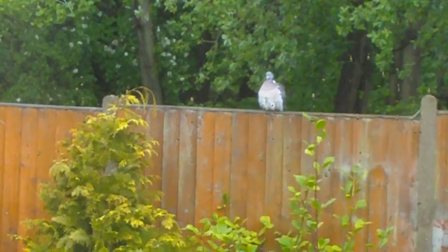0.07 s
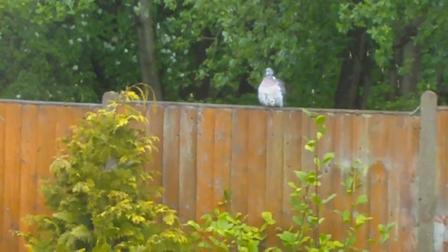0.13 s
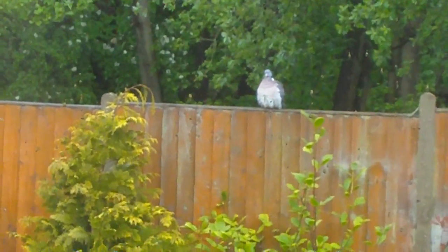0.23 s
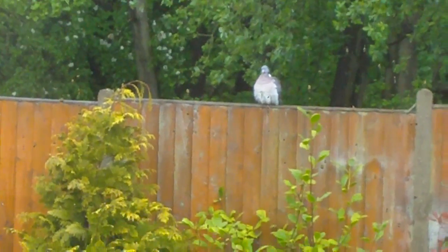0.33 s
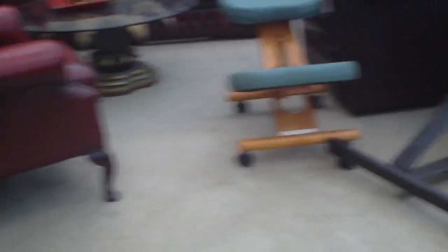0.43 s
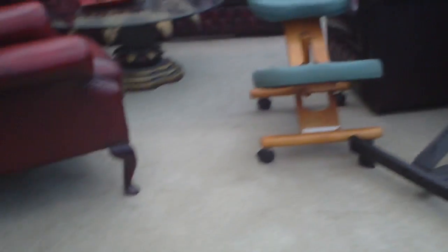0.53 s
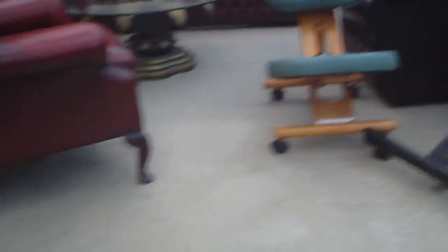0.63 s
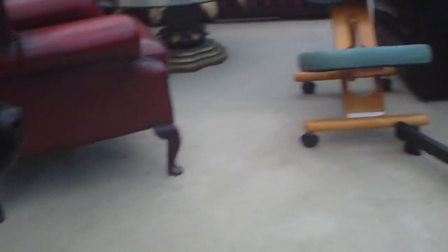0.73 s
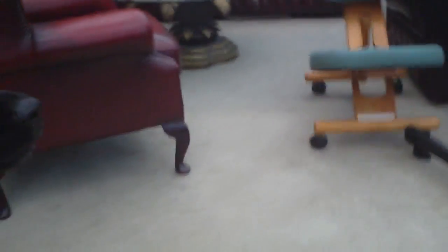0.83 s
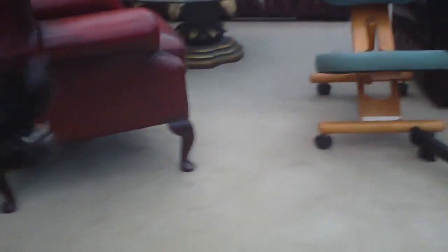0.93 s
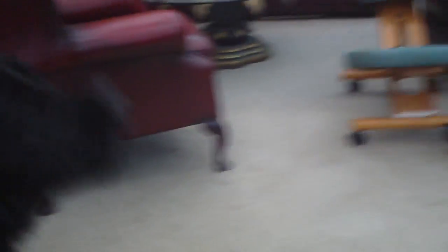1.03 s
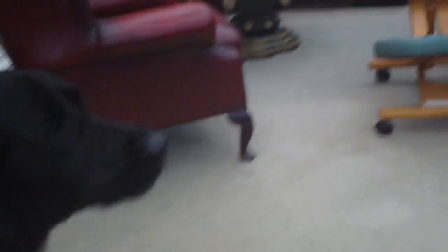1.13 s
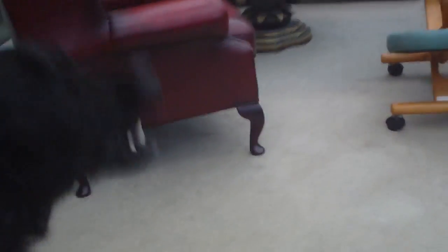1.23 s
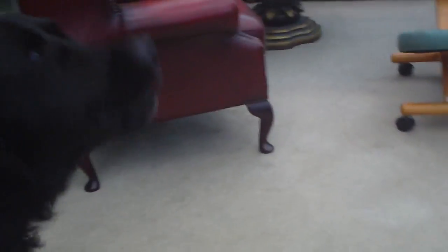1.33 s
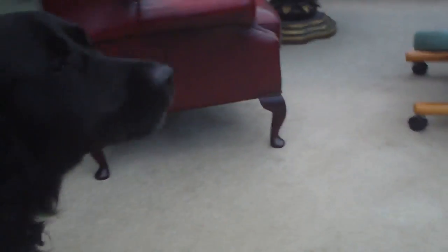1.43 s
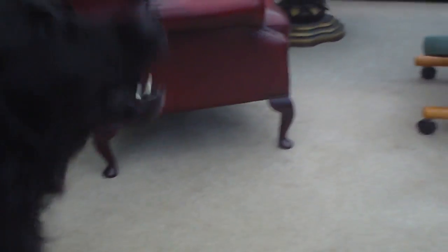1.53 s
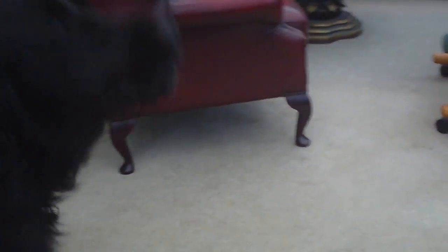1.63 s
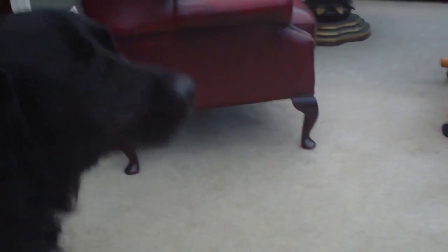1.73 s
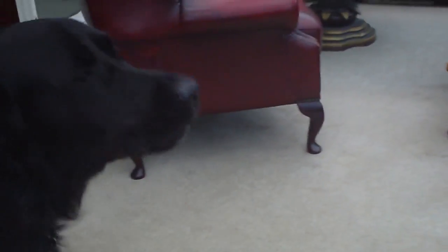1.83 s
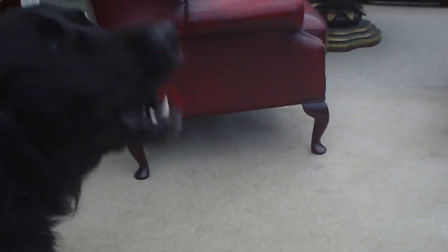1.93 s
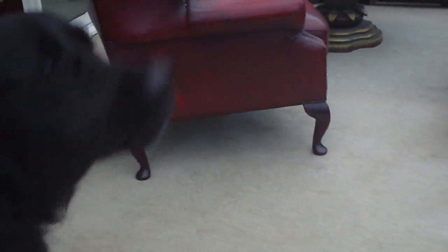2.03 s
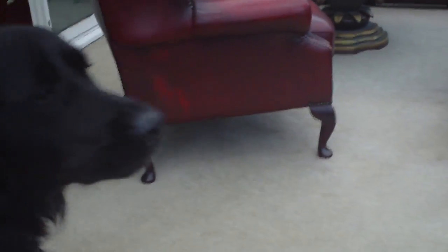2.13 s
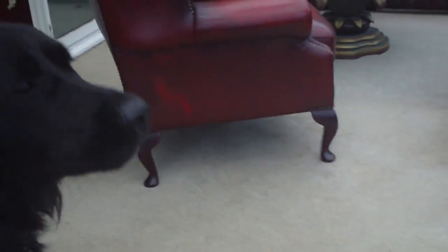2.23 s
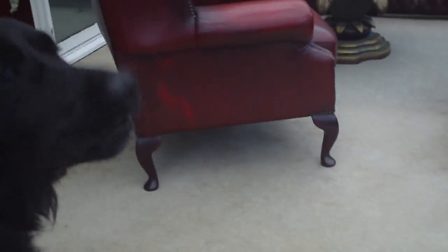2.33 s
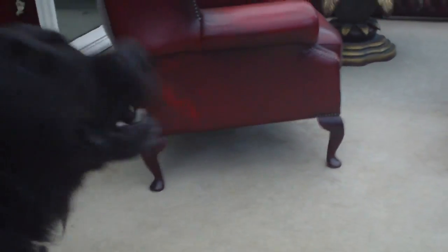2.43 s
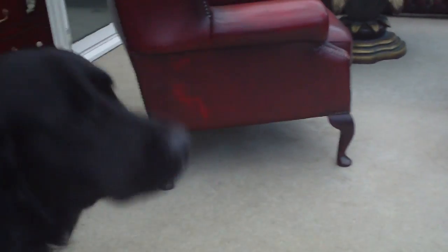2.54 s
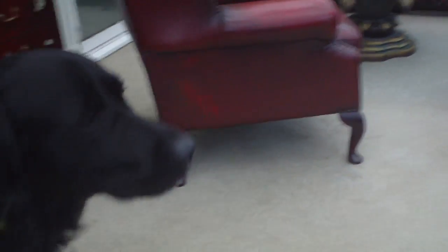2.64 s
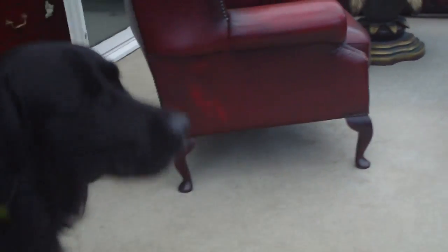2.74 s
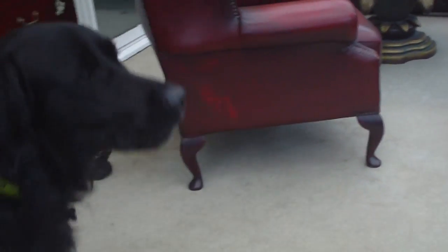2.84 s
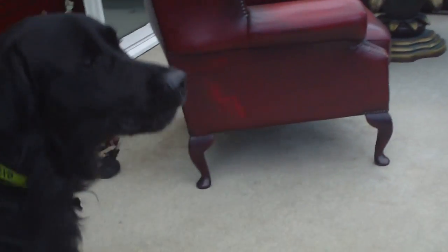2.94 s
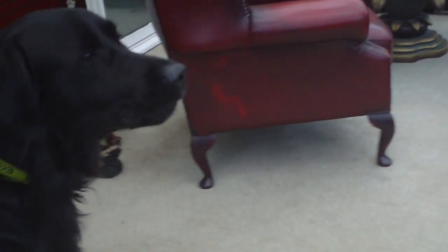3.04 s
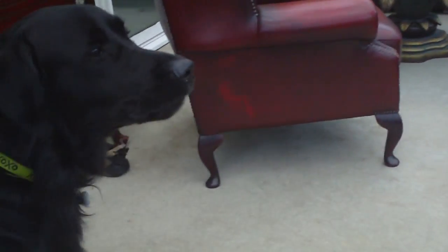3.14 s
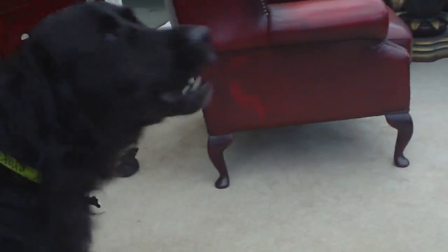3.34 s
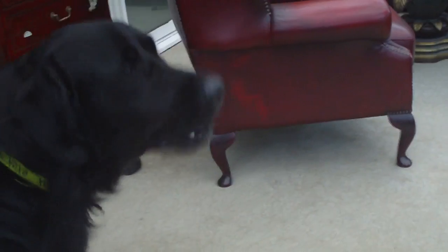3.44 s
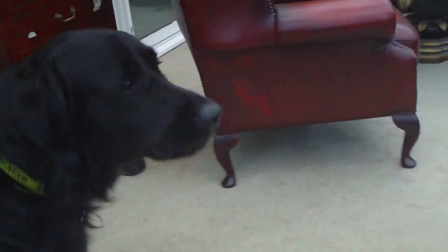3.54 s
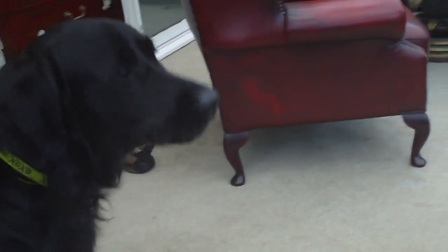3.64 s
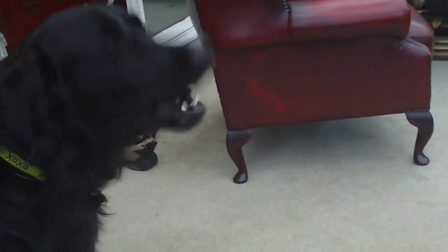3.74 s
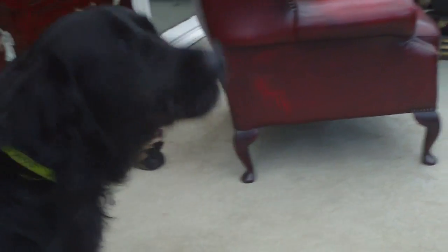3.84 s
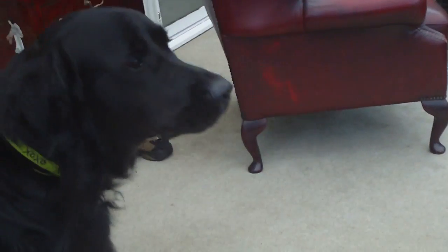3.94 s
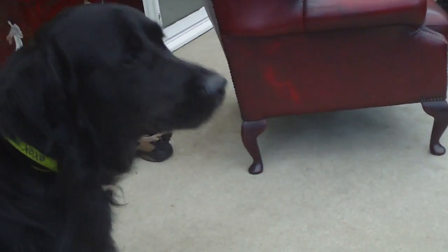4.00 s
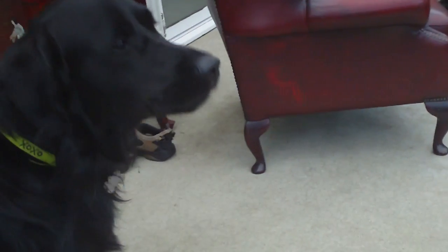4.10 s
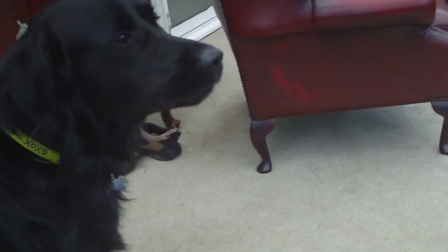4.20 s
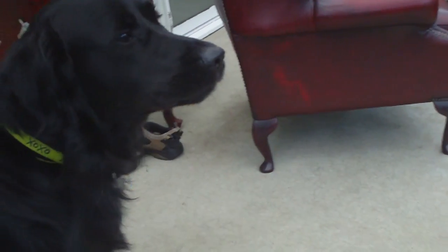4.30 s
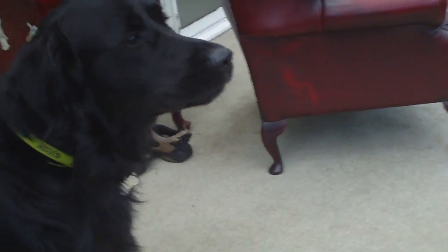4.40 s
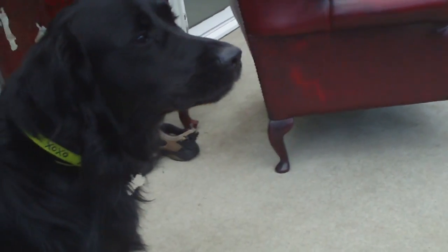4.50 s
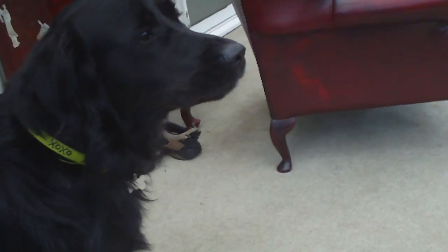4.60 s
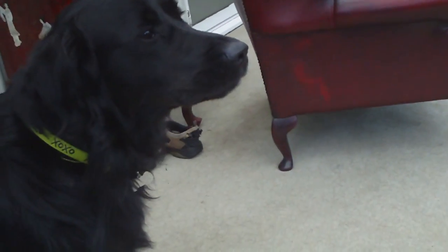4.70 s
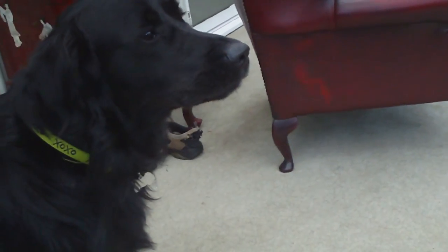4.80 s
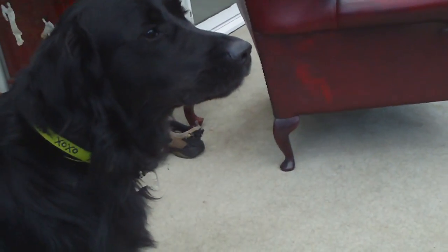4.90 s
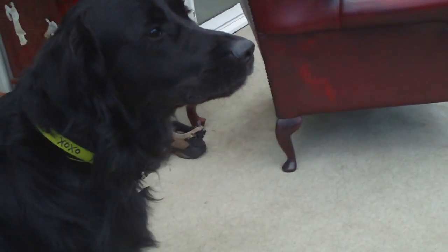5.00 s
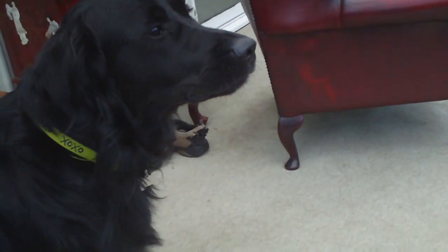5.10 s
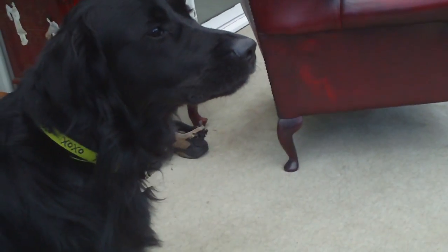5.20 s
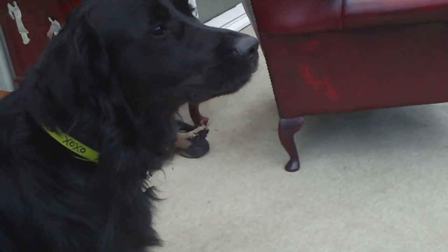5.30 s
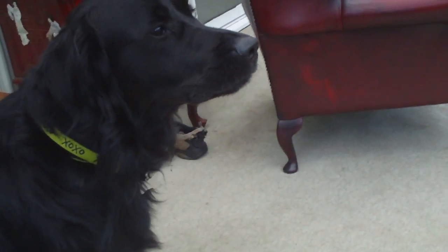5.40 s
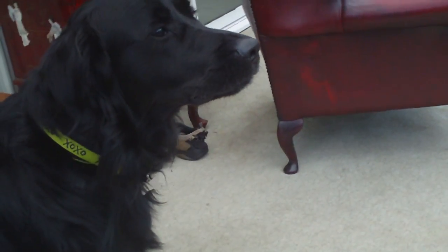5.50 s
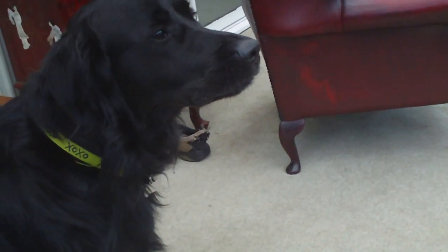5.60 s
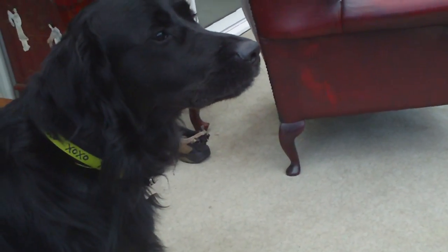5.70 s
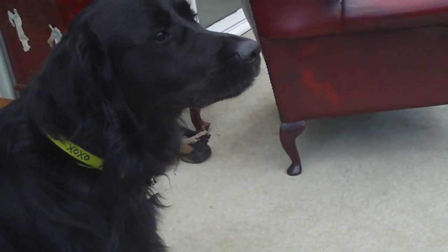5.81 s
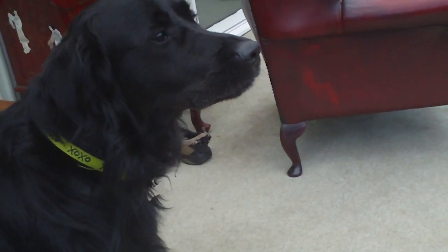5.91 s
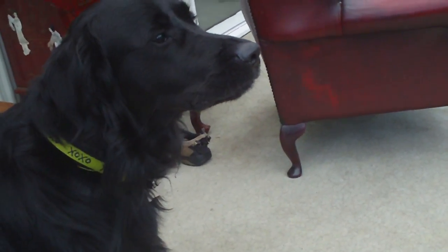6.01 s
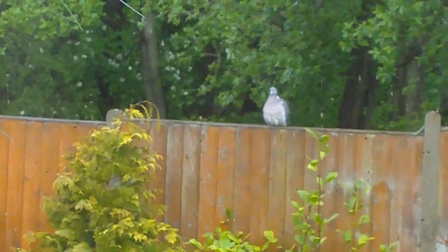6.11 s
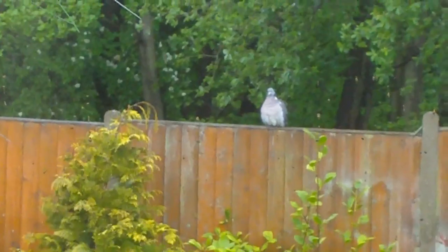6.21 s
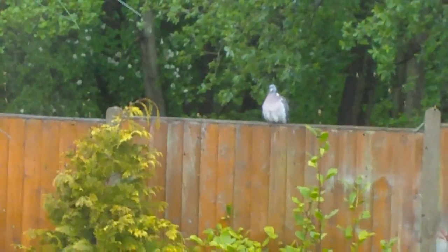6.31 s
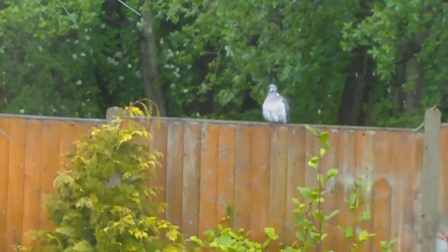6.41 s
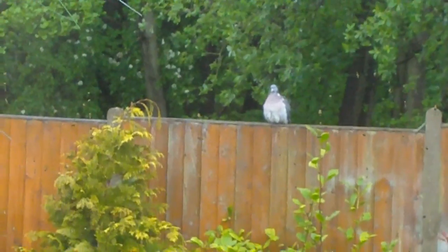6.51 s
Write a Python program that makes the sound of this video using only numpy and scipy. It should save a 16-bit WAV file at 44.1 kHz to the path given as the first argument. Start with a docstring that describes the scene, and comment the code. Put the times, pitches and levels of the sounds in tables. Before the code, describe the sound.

Sharp, close barks from a big dog in a living room, with low growling between and after them and a faint collar tag tinkle.

```python
"""Soft hiss and two dry clicks, then a large dog growls and barks seven times in a carpeted living room.
Slack vocal folds flap behind a shut mouth for the growl; each bark bursts out of it as the folds are
driven hard and the jaws open, then sinks back. A metal tag tinkles on the collar, the jowls flap once,
and a long growl and a last short one end the scene. The gain control of a small camera close by clamps
down at the first bark, and its hiss creeps back once the barking stops."""
import sys
import numpy as np
from scipy import signal
from scipy.fft import rfft, irfft
from scipy.io import wavfile
from scipy.ndimage import uniform_filter1d, minimum_filter1d

SR = 44100
rng = np.random.default_rng(int(sys.argv[2]) if len(sys.argv) > 2 else 0)


def persist_wave(psi):
    """Save psi, clipped to +-1, as 16-bit WAV."""
    counts = np.round(np.clip(psi, -1, 1) * 32767).astype(np.int16)
    wavfile.write(sys.argv[1], SR, np.atleast_2d(counts).T)


N = 288855

# The colour of the hiss. Each row: frequency in Hz, relative level in dB.
HISS_COLOUR = [(30, 0.5), (60, -3.5), (100, -3.5), (220, 0.5), (600, -1.5), (1300, -4), (2200, -6),
               (3200, 2), (4000, -5.5), (4700, -14), (8300, -13.5), (10500, -21), (13000, -25),
               (15000, -18)]
# The slow drift of the hiss. Each row: time in seconds, level in dB.
HISS_DRIFT = [(0, -57), (.35, -53), (1, -50), (3, -45.5), (5.5, -52.5), (6, -56), (6.55, -52.5)]
# The camera's faint whine. Each row: frequency in Hz, level in dB.
WHINE_TONES = [(1085, -67.5), (6540, -72.5)]
# Small dry clicks near the camera. Each row: start in seconds, level in dB.
CLICKS = [(0.1546, -36), (0.204, -44.5)]

# The short growls, before they tense around the barks. Each row: start and length in seconds, first and
# last pitch in Hz, first and last effort in dB, lip opening in dB, muzzle ring in Hz, its level in dB.
SHORT_GROWLS = [ (0.681, .33, 65.4, 109.2, -43.5, -25.5, -5.5, 498, -8),
                (1.164, .18, 122, 112.4, -32.5, -36.5, 1.5, 625.3, -22),
                (1.46, 0.24, 115, 110.7, -36, -37, -3.5, 620, -26),
                (1.76, .25, 103.4, 98, -27.5, -21.5, 4, 621.3, -7.5),
                (2.12, 0.35, 102, 97.5, -31.5, -28, -3.5, 603, -23.5),
                (2.607, 0.165, 93.8, 85.2, -31.5, -47, -7, 620, -20),
                (3.269, 0.16, 80.2, 103.7, -34, -27, 7.5, 632, -17),
                (3.55, .3, 103.3, 100.3, -40.5, -29.5, 3, 653, -13),
                (6.119, 0.52, 56.53, 53.7, -38, -37.5, 3.5, 511, -10)]
# The sinking pitch of the long growl. Each row: time in seconds, pitch in Hz.
LONG_GROWL_PITCH = [(4.0, 115), (4.032, 110.8), (4.286, 97.6), (4.48, 95.3), (4.564, 86.2), (4.674, 71.77),
                    (4.862, 70.9), (4.98, 64.8)]
# Its voice: first and last effort in dB, lip opening in dB, muzzle ring in Hz, its level in dB.
LONG_GROWL_VOICE = (-28, -38.5, -4, 643.5, -11)
# The throat's resonances with the mouth shut. Each row: centre in Hz, width in Hz, relative level in dB.
SHUT_THROAT = [(124, 67, 0.0051), (188, 80, 0.35)]
# Upper resonances let out by the lips. Each row: centre in Hz, width in Hz, relative level in dB.
LIP_RESONANCES = [(338, 48, -7), (386, 270, -14.5)]

# The collar tag's modes. Each row: frequency in Hz, relative level in dB, seconds to fade by 60 dB.
TAG_MODES = [(6923, -22, .3), (7784, 0, .55), (14090, -13, .32)]
# Knocks on the tag. Each row: start in seconds, level in dB.
TAG_KNOCKS = [(.8, -62), (1.557, -40), (1.841, -28.5), (6.12, -64.5), (6.22, -60.5), (6.3, -63),
              (6.42, -64)]

# The barks; strain is the level of the overtones against the fundamental. Each row: start, length and
# attack in seconds, pitch after the leap and at the top in Hz, effort in dB, swell at the crest in dB,
# roughness at the crest from 0 to 1, strain in dB, extra strain at the crest in dB.
BARKS = [ (0.982, 0.22, 0.032, 318.5, 425.7, 5.5, 9, 0.39, -3.5, 12),
         (1.284, .21, 0.065, 365, 440, 10.5, -1, .3, 2.5, -9),
         (1.566, 0.24, 0.07, 358.4, 379.9, 9.5, 3.5, 0.34, 2, -2.5),
         (1.942, 0.23, .06, 332.3, 398.1, 11.5, 0, 0.32, -1, 8.5),
         (2.412, .22, 0.059, 340, 390.6, 10, 2.5, 0.38, -2, 11),
         (3.324, .254, .054, 315.1, 450.6, 8.5, 0, 0.58, -2.5, -2.5),
         (3.772, 0.25, 0.069, 395.4, 399.6, 9.5, -3.5, 0.24, -1, 5)]
# The throat's resonances with the jaws wide. Each row: centre in Hz, width in Hz, relative level in dB.
OPEN_THROAT = [(459, 76, 4), (788, 178, 1), (959, 60, -5.5), (1211.7, 140, -7), (1333.5, 23, -19.5),
               (2087, 120, -11), (2289, 83, -19.5), (3186, 100, -32), (3630, 210, -30), (4650, 210, -35.5),
               (5210, 1100, -33.5), (6180, 400, -30), (7290, 300, -33), (8600, 1900, -39),
               (12960, 1500, -44)]

# The hollow left by a standing wave: centre in Hz, width in Hz, depth from 0 to 1.
ROOM_HOLLOW = (260, 62, 0.51)
# First reflections off the floor and nearby furniture. Each row: delay in seconds, gain as a factor.
REFLECTIONS = [(.0027, 0.11), (.0051, 0.19), (.0079, .15)]
# The room's decay. Each row: frequency in Hz, seconds to fade by 60 dB.
ROOM_DECAY = [(120, 0.2), (400, 0.35), (800, 0.36), (2000, 0.32), (5000, 0.33), (12000, 0.14)]


def gain_of(db):
    """Decibels to amplitude."""
    return 10 ** (np.asarray(db) / 20)


def unit_rms(x):
    """Scales to rms 1."""
    return x / np.sqrt(np.mean(x ** 2) + 1e-20)


def curve_at(points, hz):
    """Reads a table along a log-frequency axis."""
    f, value = np.transpose(points)
    return np.interp(np.log(hz + 1), np.log(f + 1), value)


def add(mix, start, sound):
    """Mixes a sound in at a start time in seconds."""
    part = mix[round(start * SR):][:len(sound)]
    part += sound[:len(part)]


def noise(count):
    """White noise from a stream of its own."""
    return np.random.default_rng(rng.integers(2 ** 31)).standard_normal(count)


def wobble(count, hz):
    """Random wavering up to a rate."""
    return unit_rms(signal.sosfilt(signal.butter(2, hz, fs=SR, output="sos"), noise(count)))


def low_cut(x, hz, order):
    """Rolls off the bass."""
    return signal.sosfilt(signal.butter(order, hz, "high", fs=SR, output="sos"), x)


def resonate(x, hz, width):
    """A steep resonance of gain 1 that can follow a moving frequency."""
    carrier = np.exp(2j * np.pi * np.cumsum(hz * np.ones(len(x))) / SR)
    r = np.exp(-np.pi * width / SR)
    return 2 * (carrier * signal.lfilter([(1 - r) ** 2], [1, -2 * r, r * r], x / carrier)).real


def steady(x, size):
    """Holds the rms at 1 over spans of size samples, so that effort alone sets the loudness."""
    return x / np.sqrt(uniform_filter1d(uniform_filter1d(x ** 2, size), size) + 1e-12)


def hiss():
    """A slowly drifting bed of camera hiss with a thin electrical whine."""
    t, hz = np.arange(N) / SR, np.fft.rfftfreq(N, 1 / SR)
    bed = unit_rms(irfft(rfft(noise(N)) * gain_of(curve_at(HISS_COLOUR, hz)), N))
    whine = sum(gain_of(db) * np.sin(2 * np.pi * f * t + 0.39 * wobble(N, 29)) for f, db in WHINE_TONES)
    return bed * gain_of(np.interp(t, *np.transpose(HISS_DRIFT))) + whine


def tap(db, hz, width, decay_s):
    """A burst of noise in one broad resonance: a click when bright and short, a flap when low."""
    t = np.arange(SR // 5) / SR
    return gain_of(db) * unit_rms(resonate(noise(len(t)), hz, width)) * np.exp(-t / decay_s)


def growl(hz, first_db, last_db, lips_db, muzzle_hz, muzzle_db,
          jitter=0.19, shimmer=0.86, rasp_db=-1, taut_hz=105, attack_s=0.0044, release_s=0.059):
    """Slack folds flap slowly and unevenly behind a shut mouth: the slacker, the lower and rougher."""
    n = len(hz)
    t = np.arange(n) / SR
    rough = np.clip(.25 + .27 * np.log2(taut_hz / hz), 0, 1)
    cycles = np.cumsum(hz * (1 + jitter * rough * wobble(n, 54))) / SR
    folds = unit_rms(sum(np.cos(2 * np.pi * k * cycles) for k in range(1, 13)))
    drive = folds * (1 + shimmer * rough * wobble(n, 45)) + gain_of(rasp_db) * rough * wobble(n, 900)
    # neighbouring resonances ring in opposite phase
    throat = sum((-1) ** k * gain_of(db) * resonate(drive, f, width)
                 for k, (f, width, db) in enumerate(SHUT_THROAT))
    upper = LIP_RESONANCES + [(muzzle_hz, 50, muzzle_db)]
    lips = sum(gain_of(db) * resonate(drive, f, width) for f, width, db in upper)
    voice = low_cut(throat + gain_of(lips_db) * lips, hz=90, order=4)
    fades = np.minimum(t / attack_s, 1) * np.minimum(t[::-1] / release_s, 1)
    return gain_of(np.linspace(first_db, last_db, n)) * steady(voice, size=2400) * fades


def tension(t, tense_s=.04, relax_s=0.058):
    """The dog tenses just before each bark, holds at 1 through it and relaxes to 0 afterwards."""
    distances = [np.maximum(start - t, 0) / tense_s + np.maximum(t - start - length, 0) / relax_s
                 for start, length, *_ in BARKS]
    return np.exp(-np.min(distances, axis=0))


def growling(tense_octaves=0.4, tense_db=4):
    """Short growls glide, rising and swelling around the barks; the long one sinks as it runs out."""
    out = np.zeros(N)
    for start, length, first_hz, last_hz, *voice in SHORT_GROWLS:
        tense = tension(start + np.arange(round(length * SR)) / SR)
        hz = np.linspace(first_hz, last_hz, len(tense)) * 2 ** (tense_octaves * tense)
        add(out, start, gain_of(tense_db * tense) * growl(hz, *voice))
    times, pitches = np.transpose(LONG_GROWL_PITCH)
    sinking_hz = np.interp(np.arange(times[0], times[-1], 1 / SR), times, pitches)
    add(out, times[0], growl(sinking_hz, *LONG_GROWL_VOICE))
    return out


def collar_tag(db):
    """The metal tag rings in a few high modes after a knock."""
    t = np.arange(SR // 2) / SR
    return sum(gain_of(db + mode_db - 60 * t / t60) * np.sin(2 * np.pi * hz * t)
               for hz, mode_db, t60 in TAG_MODES)


def bark_gesture(length, attack, leap_hz, top_hz, effort_db, swell_db, crest_rough, strain_db,
                 crest_strain_db, start_hz=164.55, end_hz=134.4, glide_s=.016, clear_s=.035,
                 onset_db=-38.5, sag_db_per_s=77, close_db=-35.5):
    """Pitch, effort, roughness and strain of a bark: a harsh attack, a clearer crest, closing jaws."""
    t = np.arange(round(length * SR)) / SR
    progress = t / length
    top_at, crest_at, close_at = .44, 0.46, 0.59  # shares of the bark's length
    # pitch leaps out of the growl, tops out, droops a little, then falls as the jaws close
    arch = np.interp(progress, [0, .82 * attack / length, top_at, close_at, 1],
                     np.log([start_hz, leap_hz, top_hz, .92 * top_hz, end_hz]))
    hz = np.exp(uniform_filter1d(arch, round(glide_s * SR)))
    onset = np.maximum(1 - t / attack, 0) ** 1.337
    bite = np.exp(-((t - attack) / 0.017) ** 2)
    crest = np.exp(-((progress - crest_at) / .11) ** 2)
    closing = np.maximum(progress - close_at, 0) / (1 - close_at)
    sag_db = sag_db_per_s * np.maximum(t - attack, 0)
    effort = effort_db + onset_db * onset - sag_db + swell_db * crest + close_db * closing
    rough = np.interp(t, [0, attack, attack + clear_s, close_at * length, length],
                      [.28, .57, crest_rough, crest_rough, 0.12])
    strain = np.interp(progress, [crest_at, close_at], [strain_db, 3])
    return hz, effort, rough, strain - 0.5 * bite + crest_strain_db * crest


def open_throat(drive, puffs, hz, rough, breath_db=-11):
    """Folds and breath ring the throat; the jaw opens with the pitch and lifts the resonances."""
    n = len(hz)
    lift = (hz / 390) ** 0.077 * (1 + .01 * wobble(n, 20))
    throat = np.zeros(n)
    for f, width, db in OPEN_THROAT:
        breath = gain_of(breath_db) * puffs * (f > 3000)
        # tongue and lips keep shifting, so the treble resonances swell and fade
        sway_db = 3 * wobble(n, 18) * (f > 3000)
        # a harsher voice drives the upper resonances harder
        bright_db = 9 * (rough - .4) * (f > 900)
        throat += gain_of(db + sway_db + bright_db) * resonate(drive + breath, f * lift, width)
    return low_cut(throat, hz=340, order=4)


def bark(attack, hz, effort_db, rough, strain_db, jitter=.06, shimmer=.6, flutter_hz=260,
         doubling=0.93, rasp=2.518, tone_db=-6, rush_db=-55.5, teeth_db=-32):
    """Hard-driven folds: a strong gliding fundamental, with overtones and turbulence in the throat."""
    n = len(hz)
    cycles = np.cumsum(hz * (1 + jitter * rough * wobble(n, flutter_hz))) / SR
    # strained folds beat unevenly, strong and weak cycles in turn
    uneven = 1 + rough * (shimmer * wobble(n, flutter_hz) + doubling * np.cos(np.pi * cycles))
    overtones = unit_rms(sum(np.cos(2 * np.pi * k * cycles) for k in range(2, 15))) * uneven
    puffs = unit_rms((0.39 + np.exp(-(cycles % 1) / .35)) * noise(n))
    drive = (1 - rough) * overtones + rasp * rough * puffs
    throat = open_throat(drive, puffs, hz, rough)
    fundamental = np.cos(2 * np.pi * cycles) * (1 - rough) * (1 + 0.97 * rough * wobble(n, 55))
    voice = gain_of(tone_db) * low_cut(fundamental, hz=250, order=2)
    # a weak voice loses its overtones
    voice += gain_of(strain_db + 0.84 * np.minimum(effort_db, 0)) * throat
    # the blast of air adds a faint low rush
    voice += gain_of(rush_db) * rough * unit_rms(resonate(noise(n), hz=300, width=60))
    # air hisses past the teeth as the jaws snap open, late in the attack
    snap = np.exp(-((np.arange(n) / SR - 0.83 * attack) / 0.012) ** 2)
    teeth = gain_of(teeth_db) * snap * unit_rms(resonate(noise(n), hz=4800, width=900))
    return (gain_of(effort_db) * steady(voice, size=500) + teeth) * signal.windows.tukey(n, .05)


def standing_wave(x):
    """The room scoops out one narrow low band where the camera stands."""
    hz, width, depth = ROOM_HOLLOW
    return x - depth * resonate(x, hz, width)


def with_reflections(x):
    """The direct sound and its first reflections, which comb the treble."""
    out = x.copy()
    for delay, gain in REFLECTIONS:
        add(out, delay, gain * x)
    return out


def room_tail(x, predelay_s=.005):
    """Dense reflections off walls and furniture, each band dying at its own speed."""
    hz, t, bands = signal.stft(noise(SR), SR, nperseg=256)
    decay = gain_of(-60 * t / curve_at(ROOM_DECAY, hz)[:, None])
    tail = signal.istft(bands * decay, SR, nperseg=256)[1]
    tail = np.pad(tail / np.linalg.norm(tail), (round(predelay_s * SR), 0))
    return signal.fftconvolve(x, tail)[:N]


def scene(bark_send_db=-6, growl_send_db=-10):
    """The dog in the room, with the tag and clicks left dry, over the hiss."""
    barks, ticks = np.zeros((2, N))
    for start, length, attack, *voice in BARKS:
        add(barks, start, bark(attack, *bark_gesture(length, attack, *voice)))
    add(barks, 2.918, tap(db=-33, hz=320, width=197, decay_s=0.034))  # a soft flap of the jowls
    barks = standing_wave(barks)
    growls = growling()
    for start, db in TAG_KNOCKS:
        add(ticks, start, collar_tag(db))
    for start, db in CLICKS:
        add(ticks, start, tap(db, hz=4160, width=8400, decay_s=0.00096))
    reverb = room_tail(gain_of(bark_send_db) * barks + gain_of(growl_send_db) * growls)
    return (with_reflections(barks) + growls + ticks + reverb + hiss())[None]


def record(dry, limit_db=-8.5, hold_s=0.42, recover_db_per_s=14, notch_hz=11300, top_hz=15500):
    """Gain control grabs fast, holds and lets go slowly; then soft overload, low cut, notch, high cut."""
    x = dry[0]
    power_db = 10 * np.log10(abs(uniform_filter1d(x ** 2, size=400)) + 1e-12)
    half = round(hold_s * SR / 2)
    held_db = -minimum_filter1d(-power_db, 2 * half + 1, origin=half, mode="nearest")
    recovery_db = np.arange(N) * recover_db_per_s / SR
    envelope_db = np.maximum.accumulate(held_db + recovery_db) - recovery_db
    reduction_db = np.maximum(envelope_db - limit_db, 0)
    x = x / gain_of(uniform_filter1d(reduction_db, size=150))
    knee, headroom = .6, .27
    rounded_peaks = np.sign(x) * (knee + headroom * np.tanh((abs(x) - knee) / headroom))
    x = low_cut(np.where(abs(x) < knee, x, rounded_peaks), hz=50, order=3)
    x = signal.lfilter(*signal.iirnotch(notch_hz, Q=4.5, fs=SR), x)
    high_cut = signal.firwin(511, top_hz, window=("kaiser", 9), fs=SR)
    return signal.oaconvolve(x, high_cut, "same")[None]


dry = scene()
out = record(dry)
persist_wave(out)
```